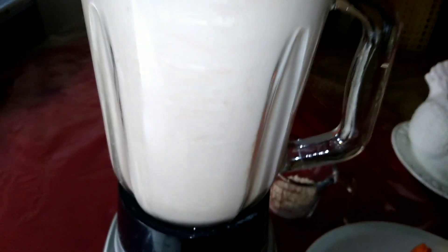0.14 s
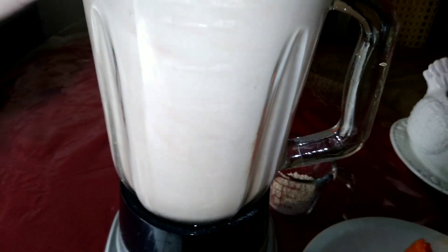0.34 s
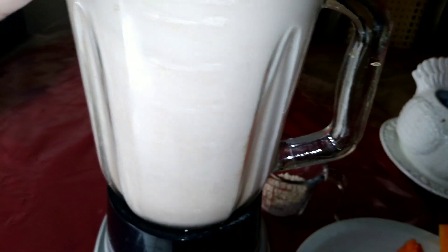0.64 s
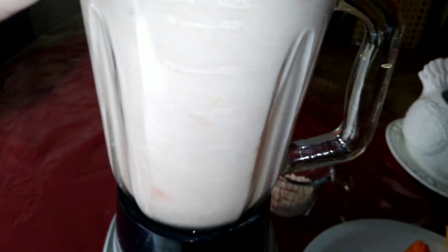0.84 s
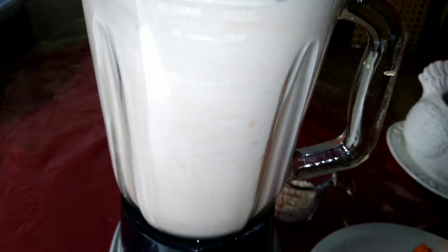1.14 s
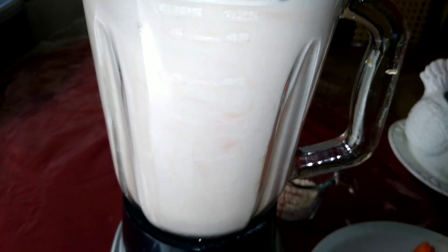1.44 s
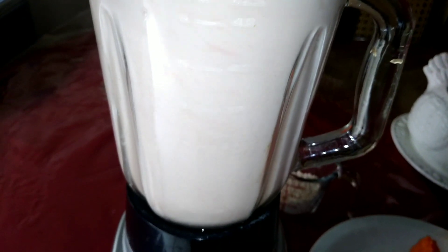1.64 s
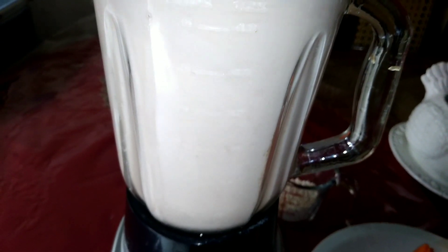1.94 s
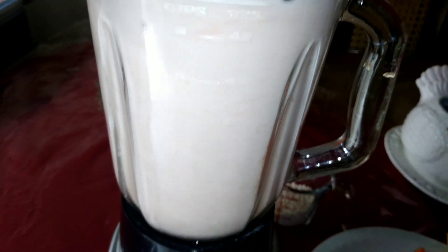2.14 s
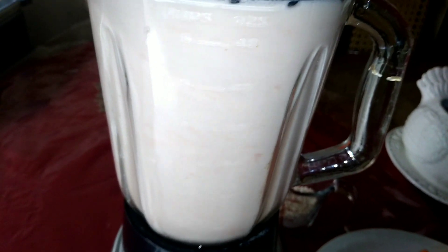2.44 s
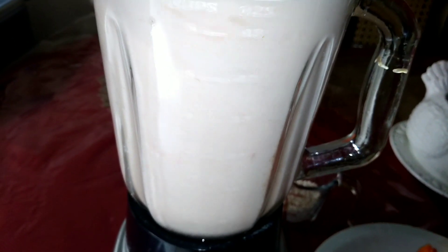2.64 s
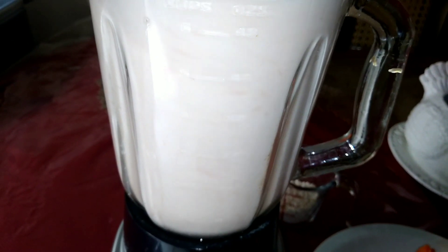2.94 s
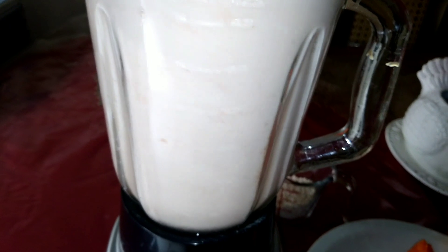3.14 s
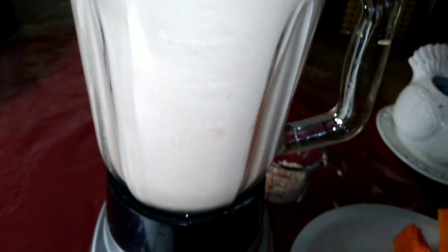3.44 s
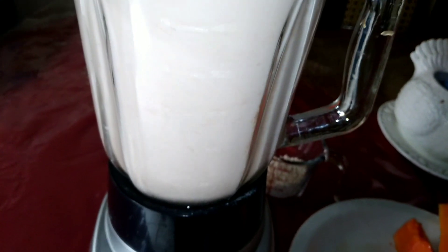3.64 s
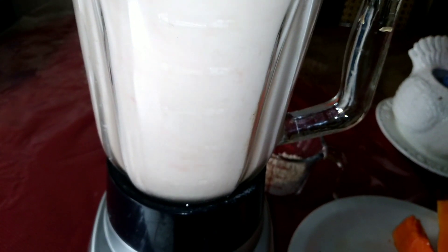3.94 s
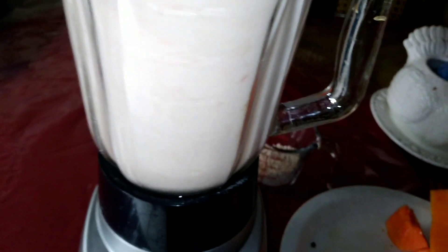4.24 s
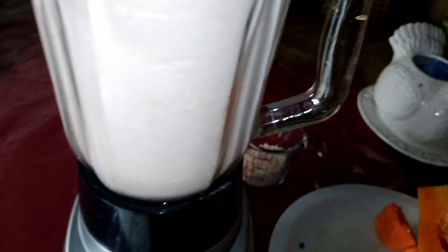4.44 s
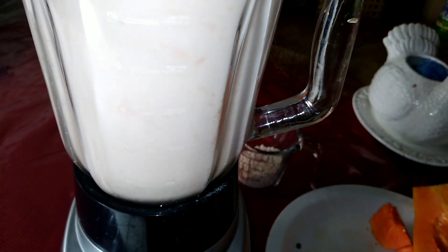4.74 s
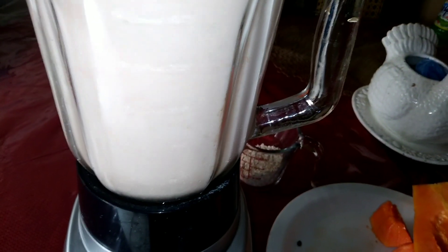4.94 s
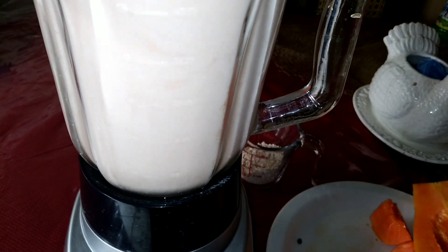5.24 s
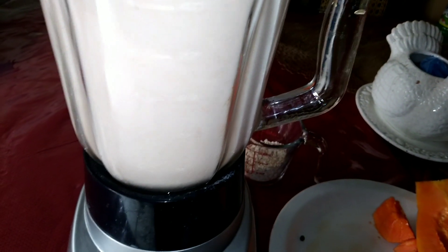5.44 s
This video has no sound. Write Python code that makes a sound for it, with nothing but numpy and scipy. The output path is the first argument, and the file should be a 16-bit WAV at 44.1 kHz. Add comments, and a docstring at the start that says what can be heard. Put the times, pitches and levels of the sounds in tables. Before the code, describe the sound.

Close phone pickup of an electric blender in a small kitchen. Dense, hard crunches and bright glass clatter open over a buzzing motor, with fizzing chips mostly on the left. The load eases into a steady whir and rough hissing swirl, low rumble and bubbling underneath. Occasional lumps still knock the jar, while a fine froth hiss grows. It never switches off.

```python
"""A countertop blender with a glass jar crushes ice into a thick milky drink, close to a phone in a kitchen.
From the start a motor hums and whines, its tones following a wandering shaft speed, over a rumbling base.
At first two blades chop ice in loud rattles, hard lumps slam the jar and coarse chips fizz round the wall.
Later come stray knocks and a growing froth; all along, noise bursts at each blade pass make the grit crackle,
and short rising tones make the vortex bubble, with a swelling gulp now and then."""
import sys
import numpy as np
from scipy import signal
from scipy.fft import rfft, irfft, next_fast_len
from scipy.io import wavfile
from scipy.ndimage import uniform_filter1d

SR = 44100
rng = np.random.default_rng(int(sys.argv[2]) if len(sys.argv) > 2 else 0)


def transcribe(u):
    """Save the signal u as a 16-bit wav file named by the first command-line argument.

    u: samples, shape (n,) or (channels, n), limited to [-1, 1]; the rate is SR.
    q: integer samples, one column per channel.
    """
    v = np.clip(np.atleast_2d(u).T, -1, 1)
    q = np.round(v * 32767).astype(np.int16)
    wavfile.write(sys.argv[1], SR, q)


N = 246519
T = np.arange(N) / SR

# modes of the glass wall where hard ice hits it: (f/Hz, width/Hz, level/dB)
WALL_MODES = [(403, 280, -7), (930, 460, 4.5), (1590, 1100, 3), (2385, 160, 7.5), (2630, 110, 1),
              (3500, 870, 4), (4320, 2300, -11), (5280, 220, -0.5), (6120, 600, 3.5), (7100, 1170, 1),
              (8480, 1760, 2), (10500, 1160, -4), (13200, 5700, -1.5)]
# large air pockets gulped by the vortex: (t/s, half length/s, level over the steady bubbling/dB)
GULP_SWELLS = [(0.12, 0.063, 12.5), (0.505, 0.019, 19), (0.62, 0.014, 8), (1.09, 0.02, 4), (1.3, 0.054, 12),
               (1.48, 0.065, 7.5), (1.57, 0.023, 11), (1.78, 0.022, 11), (1.91, 0.05, 9.5),
               (2.19, 0.027, 16.5), (2.36, 0.043, 19), (3.39, 0.034, 7), (3.91, 0.027, 7)]


def undb(db):
    """Decibels to gain."""
    return 10 ** (np.asarray(db) / 20)


def unit(x):
    """Scale to an rms of one."""
    return x / np.sqrt(np.mean(x ** 2) + 1e-18)


def curves(table):
    """The columns of a timed table, joined by straight lines."""
    s, *columns = np.transpose(table)
    return [np.interp(T, s, c) for c in columns]


def walk(rate):
    """Random levels held 1 / rate s and slewed twice; spread near 1."""
    k = int(SR / rate)
    held = np.repeat(rng.standard_normal(N // k + 1), k)
    return 1.3 * uniform_filter1d(uniform_filter1d(held, k), k)[:N]


def swells(table):
    """A smooth rise and fall in dB for each row."""
    return sum(db * np.exp(-((T - s) / half) ** 2) for s, half, db in table)


def along(table, hz):
    """Read (Hz, value) points on a log-frequency axis."""
    f, value = np.transpose(table)
    return np.interp(np.log(hz + 1), np.log(f), value)


def bins(size=4096):
    """Frequencies on which responses are drawn."""
    return np.arange(size // 2 + 1) * SR / size


def resonances(hz, centre, width, db):
    """Gain of a set of steep-sided resonances, each 9 dB down at one width from its centre."""
    bell = 1 / (1 + ((hz[:, None] - centre) / width) ** 2)
    return np.sqrt((bell * bell * bell) @ undb(db) ** 2)


def shape(pair, gain):
    """Filter each channel with this gain at each frequency, made causal by folding its cepstrum."""
    cepstrum = irfft(np.log(gain + 1e-5))
    half = len(cepstrum) // 2
    fold = np.r_[1, np.full(half - 1, 2), np.zeros(half)]
    response = irfft(np.exp(rfft(cepstrum * fold)))
    return signal.fftconvolve(pair, response[None], axes=1)[:, :pair.shape[1]]


def fade(x, seconds):
    """Let every push die away exponentially."""
    return signal.lfilter([1], [1, -np.exp(-1 / (seconds * SR))], x)


def noise_pair(size, unlike):
    """Noise from a source with some breadth: partly the same at both ports, partly different."""
    mid, side = rng.standard_normal((2, size))
    return np.array([mid + unlike * side, mid - unlike * side]) / np.sqrt(1 + unlike ** 2)


def crackle(turns, scatter_db, snap_s, slip, smooth, unlike):
    """Each of the two blades throws a tiny burst of grit per turn, uneven in size and time, over a smooth hiss."""
    count = int(2 * turns[-1])
    late, size = rng.standard_normal((N // 64, 2))[:count].T
    # slip is the timing spread, in blade passes
    at = np.searchsorted(turns, (np.arange(count) + slip * late) / 2).clip(0, N - 1)
    pushes = np.bincount(at, undb(scatter_db * size.clip(-2, 1.5)), N)
    force = unit(fade(pushes, snap_s)) + smooth
    return unit(force * noise_pair(N, unlike))


def motor(turns):
    """Shaft hum and armature whine follow the speed; the torque throbs at twice the mains frequency."""
    # level of the shaft hum, which comes and goes with the load on the blades: (t/s, level/dB)
    hum_levels = [(0.0, -53), (0.06, -49.5), (0.25, -50.5), (0.56, -66), (0.61, -51), (0.86, -51.5),
                  (0.9, -65), (1.06, -51), (1.26, -53), (1.29, -61), (1.42, -44), (1.52, -44.5), (1.6, -58),
                  (1.82, -44), (2.24, -46), (2.4, -32.5), (2.51, -49), (2.63, -44.5), (2.68, -53.5),
                  (2.94, -46), (3.03, -52), (3.39, -42), (3.69, -48.5), (3.86, -43.5), (4.75, -46.5),
                  (5.25, -44), (5.4, -49), (5.59, -46.5)]
    # level of the armature whine: (t/s, level/dB)
    whine_levels = [(0, -57), (0.12, -44), (0.36, -51), (0.6, -48), (0.68, -50.5), (1.0, -49.5),
                    (1.27, -45), (1.47, -48), (1.58, -47), (1.94, -47.5), (2.1, -49), (2.22, -47),
                    (2.32, -58), (2.48, -42.5), (2.63, -48.5), (2.75, -47), (3.05, -44.5), (3.3, -52),
                    (3.55, -45.5), (3.98, -52.5), (4.15, -48.5), (4.65, -47), (4.75, -48), (4.83, -47),
                    (4.98, -46), (5.12, -56), (5.25, -45.5), (5.5, -46), (5.59, -51)]
    # weaker tones, before easing and throb: (multiple of the shaft speed, left level/dB, right level/dB)
    overtones = [(2, -67.5, -65.5), (3, -64.5, -63), (5, -73, -61.5), (6, -82, -57.5), (9, -86, -62),
                 (24, -49, -70), (48, -74, -70)]
    mains_hz, cruise_hz = 60, 200

    angle = 2 * np.pi * turns
    excess_hz = np.gradient(turns) * SR - cruise_hz
    mains = 2 * np.pi * 2 * mains_hz * T
    throb = np.cos(mains)

    # the hum wavers, the more so as the shaft is dragged below its cruising speed
    hum_db, = curves(hum_levels)
    waver_db = 0.6 + 0.31 * np.maximum(-excess_hz, 0)
    hum = np.sqrt(2) * undb(hum_db + waver_db * walk(24.04)) * np.sin(angle)

    # the armature squeaks as the blades nearly jam
    squeak_s, rise_s, decay_s, squeak_db = 0.44, 0.005, 0.033, -33.5
    jammed_s = np.maximum(T - squeak_s, 0)
    squeak = undb(squeak_db) * (1 - np.exp(-jammed_s / rise_s)) * np.exp(-jammed_s / decay_s)

    # twelve whine cycles per turn; the mains throb adds a tone just below, 9 dB weaker
    slots = 12 * angle + 0.42 * walk(60)
    whine_db, = curves(whine_levels)
    whine_gain = undb(whine_db + 1.9 * walk(23.94)) + squeak
    whine = np.sqrt(2) * whine_gain * (np.sin(slots) + undb(-9) * np.sin(slots - mains))

    # left and right trims in dB
    out = np.outer(undb([-.6, .6]), hum) + np.outer(undb([1.3, -2]), whine)
    # the weaker tones come out as the load eases and the shaft speeds up
    ease_db = 0.82 * excess_hz - .45
    for order, *ears_db in overtones:
        tone = np.sqrt(2) * np.sin(round(order) * angle + rng.uniform(0, 2 * np.pi))
        tone_gain = undb(ease_db + 3.2 * walk(9)) * (1 + 0.79 * throb)
        out += np.outer(undb(ears_db), tone * tone_gain)
    return out


def churn(turns):
    """Liquid rushes low, grit rings the glass in the middle, fine splinters spray on top."""
    # hollow gurgle of the swirling drink: (f/Hz, width/Hz, level/dB)
    swirl_modes = [(844, 200, -2.5), (1094, 310, -2.5), (1620, 460, -8)]
    # the swirl gurgles louder for a moment: (t/s, half length/s, gain/dB)
    gurgle_swells = [(1.45, 0.022, 6), (2.19, 0.035, 7), (2.78, 0.081, 2), (2.98, 0.051, 4.5),
                     (3.42, 0.056, 3), (4.12, 0.034, 0), (4.62, 0.05, 3), (4.95, 0.049, 1)]
    rush_db, swirl_db, grit_db, spray_db, chips_db = -0.33, 1, -1, -0.47, -6

    # power shares that split the spectrum between the layers
    hz = bins()
    below_grit, below_spray = (1 / (1 + (hz / edge) ** 16) for edge in (4200, 6600))
    above_froth = 1 / (1 + (7600 / (hz + 1)) ** 30)
    middle = np.sqrt(below_spray - below_grit)

    # rush and spray share one slow drift
    flow_db = 0.54 * walk(5.8)
    rush = crackle(turns, scatter_db=2.5, snap_s=0.0018, slip=.3, smooth=0.99, unlike=0.48)
    rush = rush * undb(rush_db + flow_db + 1.3 * walk(30))
    grit = crackle(turns, scatter_db=8, snap_s=0.00029, slip=0.16, smooth=0.74, unlike=1.0)
    grit = grit * undb(grit_db + 2.3 * walk(35))
    spray = crackle(turns, scatter_db=4.0, snap_s=0.00095, slip=.2, smooth=0.66, unlike=0.055)
    spray = spray * undb(spray_db + flow_db + 0.5 * walk(30))

    # small chips of ice, hard enough to ring the wall, keep ticking in light flurries
    chips = crackle(turns, scatter_db=6.5, snap_s=0.001, slip=0.11, smooth=0.39, unlike=0.69)
    chips = chips * undb(chips_db + 3.1 * walk(30))
    # they ring it mostly above 4240 Hz
    chips_band = np.sqrt(below_spray / (1 + (4240 / (hz + 1)) ** 24)) + 0.22
    wall = resonances(hz, *np.transpose(WALL_MODES))

    # the swirl opens and closes the lower resonances, each in its own time
    swirl = 0
    for centre_hz, width_hz, mode_db in swirl_modes:
        gurgle = shape(noise_pair(N, unlike=0.12), resonances(hz, centre_hz, width_hz, [mode_db]))
        swirl = swirl + gurgle * undb(swirl_db + swells(gurgle_swells) + 3.35 * walk(30))

    # froth grows by 3.5 dB per second as the drink gets smooth
    froth_hz, froth_width_hz, froth_start_db = 6900, 1200, -16
    froth = shape(noise_pair(N, unlike=0.66), resonances(hz, froth_hz, froth_width_hz, [froth_start_db]))
    froth = froth * undb(3.5 * T)

    rush_tilt_db = along([(500, 0.13), (900, -1.6), (1700, -1.2), (2200, -0.8)], hz)
    return (swirl + froth
            + shape(rush, np.sqrt(below_grit) * undb(rush_tilt_db))
            + shape(grit, middle)
            + shape(spray + 0.064 * grit, np.sqrt(above_froth))
            + shape(chips, chips_band * wall))


def glass(pair, ring_db=-7, ring_t60=0.016, edge_hz=6000):
    """The many close, high modes of the glass ring on briefly after every tick, as a short noise tail."""
    t = np.arange(SR // 10) / SR
    tail = unit(rng.standard_normal((1, len(t))) * np.exp(-np.log(1000) * t / ring_t60)) / np.sqrt(len(t))
    share = undb(ring_db) / np.sqrt(1 + (edge_hz / (bins() + 1)) ** 8)
    rung = shape(signal.fftconvolve(pair, tail, axes=1)[:, :N], share)
    # make room for the added power
    return shape(pair + rung, 1 / np.sqrt(1 + share ** 2))


def jar(force):
    """Jar and housing ring with their resonances, which reach each port with a different strength."""
    # resonances of jar, lid and motor housing: (f/Hz, width/Hz, left level/dB, right level/dB)
    jar_modes = [(790, 370, -37.5, -38), (1010, 102, -34.5, -33.5), (1210, 84, -38.5, -34.5),
                 (1627, 413, -32.5, -30), (2260, 260, -33, -55), (3190, 900, -36.5, -31),
                 (3175, 320, -27.5, -53), (4240, 1800, -29, -36.5), (4795, 380, -21.5, -41),
                 (5380, 590, -22, -39.5), (5827, 460, -23.5, -36.5), (6940, 970, -30.5, -42),
                 (8070, 590, -31.5, -31), (9080, 1400, -33, -32), (10450, 830, -37, -33),
                 (12500, 1050, -41.5, -40), (14400, 1500, -55, -44)]
    centre, width, *ears_db = np.transpose(jar_modes)
    ears = np.array([resonances(bins(), centre, width, db) for db in ears_db])
    both = np.sqrt(np.mean(ears ** 2, axis=0))
    # symmetric filters set the level at each port without shifting phase
    shading = np.fft.fftshift(irfft(ears / both), axes=1)[:, 1:]
    return signal.fftconvolve(shape(force, both), shading, mode="same", axes=1)


def fizz(turns, right_db=-25):
    """Coarse chips skate round the wall at every blade pass; their narrow band reaches mostly the left port."""
    # left level of the fizz, until the chips are ground away: (t/s, level/dB)
    fizz_levels = [(0, -25.5), (0.05, -29), (0.16, -19.5), (0.255, -26.5), (0.277, -16), (0.31, -23),
                   (0.345, -18.5), (0.368, -20.5), (0.4, -17), (0.47, -21.5), (0.52, -28), (0.56, -23.5),
                   (0.63, -21), (0.72, -24.5), (0.76, -17), (0.8, -32), (0.9, -39), (1.2, -70)]
    # narrow band in which the skating chips make the glass sing: (f/Hz, width/Hz, relative level/dB)
    singing_modes = [(4900, 550, -13.5), (5250, 210, -0.5), (5590, 270, 0), (5930, 180, -5),
                     (7000, 600, -14), (8400, 640, -20.5)]
    level_db, = curves(fizz_levels)
    skating = crackle(turns, scatter_db=3.3, snap_s=0.0011, slip=0.13, smooth=0.7, unlike=0.87)
    sung = unit(shape(skating, resonances(bins(), *np.transpose(singing_modes))))
    return sung * undb(level_db) * undb([[0], [right_db]])


def vortex(count=1100, spread=0.13, cycles=1.96, rise=0.1, size_db=3):
    """Air pockets ring briefly in the thick drink, rising in pitch."""
    # centre of the scattered ring pitches of the air pockets: (t/s, f/Hz)
    pocket_pitch = [(0, 374), (.5, 368), (.9, 310), (1.3, 353), (1.5, 276), (2.35, 291), (5.59, 302.3)]
    # level of the bubbling, which rises early, dips near 2.5 s, is loudest near 4.3 s, then falls:
    # (t/s, level/dB)
    bubbling_levels = [(0, -61), (0.9, -58.5), (1.4, -58), (2.5, -60), (4.3, -56.5), (5.59, -64)]
    out = np.zeros(N + SR)
    t = np.arange(SR // 12) / SR
    pocket_hz, = curves(pocket_pitch)
    for start, (pitch, size) in zip(rng.integers(0, N, count), rng.standard_normal((count, 2))):
        # age counts cycles of the starting pitch
        age = t * pocket_hz[start] * np.exp(spread * pitch)
        swell = (1 - np.exp(-2 * age)) * np.exp(-age / cycles)
        ring = np.sin(2 * np.pi * age * (1 + rise * age / 20))
        out[start:start + len(t)] += undb(size_db * size) * swell * ring
    # even out the running loudness, then set the level
    bubbles = out[:N] / np.sqrt(uniform_filter1d(out[:N] ** 2, SR // 12) + 1e-9)
    bubbling_db, = curves(bubbling_levels)
    return bubbles * undb(bubbling_db + swells(GULP_SWELLS) + 2.0 * walk(15))


def rumble():
    """The base shudders on the counter in the deep bass; the drink sloshes above it, harder at each gulp."""
    # spectrum of base and counter, relative only for the shudder: (f/Hz, level/dB)
    rumble_spectrum = [(20, -59), (35, -59), (50, -45.5), (70, -41.5), (88, -40), (125, -49), (170, -39),
                       (260, -33.5), (400, -41.5), (550, -51.5), (900, -54.5)]
    # the base shudders harder on the counter: (t/s, half length/s, level over its steady rumble/dB)
    shudder_swells = [(0.95, 0.075, 13), (2.05, 0.3, 7.5)]
    shake_db, slosh_db, slosh_db_per_s = -67.5, 1.2, -0.5
    hz = bins()
    gain = undb(along(rumble_spectrum, hz))
    deep = 1 / (1 + (hz / 135) ** 8)
    shudder = unit(shape(noise_pair(N, unlike=0.086), gain * np.sqrt(deep)))
    shudder = shudder * undb(shake_db + swells(shudder_swells) + 0.48 * walk(8.6))
    # the sloshing calms as the drink gets smooth
    slosh = shape(noise_pair(N, unlike=0.23), gain * np.sqrt(1 - deep))
    slosh_level_db = slosh_db + slosh_db_per_s * T + 0.27 * swells(GULP_SWELLS) + walk(13)
    return shudder + slosh * undb(slosh_level_db)


def ice(shaft_hz, scatter_db=5.5, snap_s=0.00048, debris=0.92, bite_s=0.0015, settle_s=0.022, level_db=0.36):
    """A caught lump is struck once per blade pass until it breaks; its debris hisses briefly after."""
    # lumps caught by the blades, bands relative to strength: (t/s, length/s, strength/dB, low thud/dB before
    # weighting, mid clatter/dB, glass ring/dB, shrill scrape/dB, splinters/dB)
    lumps = [(0.064, 0.052, 20, -14.5, -17, -4.5, 0.5, -2.5), (0.113, 0.027, 17.5, -9.5, -7.5, -3, 0, -3),
             (0.156, 0.0014, 11.5, 0.5, 1, 6, 0, -4), (0.214, 0.014, -0.5, 7, 10.5, -4, 0, 1),
             (0.242, 0.0032, 7, 1, 2.5, 11, -3, -4), (0.349, 0.0044, 9.5, -4, 0, 7.5, 0, 0),
             (0.377, 0.0018, 13.5, -15, -11, 10.5, 0, -10), (0.383, 0.019, 8.5, -17, -14, -4, 0, -15),
             (0.483, 0.02, 16.5, -9.5, -12, 6, 7, -9), (0.594, 0.0096, 19.5, -14.5, -15, -1.5, 1, -11),
             (0.613, 0.0085, 15.5, -7.5, -7.5, 5, -4, 0), (0.744, 0.013, 3, 0, 5, 7, 0, -9),
             (0.76, 0.004, 10, -2, -1, 13, 2, -5), (0.824, 0.024, 10, -4.5, -2.5, -2, 4, -3),
             (0.886, 0.011, 7.5, -1.5, -4, -2, 0, -2), (0.905, 0.017, 16, -9, -2.5, -6, -4, -2),
             (0.951, 0.0052, 11.5, -3, -4, -6, 0, -3), (0.967, 0.0134, 17, -5, -1.5, -7, -1, -7),
             (1.232, 0.029, 15.5, -11, -12.5, -6.5, -12, -13), (1.633, 0.014, 23, -8, -9.5, -5.5, -9.5, 4),
             (1.669, 0.0034, 9, -29, -26, -15, -18, -15), (1.752, 0.0082, 4.5, -4, -9, 2, -6, -12),
             (2.138, 0.015, 5.5, -6.5, -6, -0.5, -8, -10), (2.427, 0.01, 6.5, 0.5, 0, -2, 0, -3),
             (2.487, 0.0087, -2.5, 9, 13, 0, -4, 0), (2.954, 0.0021, 15, -7.5, -8, -9, -10, -7),
             (2.959, 0.022, 4, -5, -9, -22, -10, -14), (3.137, 0.0082, -2, -1, -1.5, 6, 5, -6),
             (3.385, 0.008, 14.5, -9, -9, -9, -3, -6), (3.395, 0.023, 7.5, -6.5, -3, -15, -5, -11),
             (3.515, 0.0058, 5.5, -3, -1, -9, -1, -6), (3.884, 0.0043, 9, -1.5, -8, -6, -2, -6),
             (4.102, 0.02, 1.5, -1, -1, 0, 2, -2), (4.37, 0.0085, 13.5, -3, -4, -8, -6, 3),
             (4.574, 0.017, 4, -8, 0.5, -5, -6, -3), (4.823, 0.012, 14, -8.5, -4, -9, -3, -10),
             (4.836, 0.018, -6, -10, -6, -12, -5, -10), (4.914, 0.004, 12, -5.5, -3, 2, 5, -6),
             (4.962, 0.018, 3.5, -3, -4, -3, 0, -7), (5.013, 0.0034, 1, -5, -9, 0, 0, -3),
             (5.17, 0.006, 5.5, -5, -1, -2, -1, -3)]
    out = np.zeros((2, N + SR))
    t = np.arange(SR // 8) / SR
    wall = resonances(bins(), *np.transpose(WALL_MODES))
    for s, length, crunch, thud_db, clatter_db, ring_db, scrape_db, splinter_db in lumps:
        start = int(s * SR)
        blade_hz = 2 * shaft_hz[start]
        late, size = rng.standard_normal((32, 2)).clip(-1.5, 1.5).T
        blows = np.abs(np.arange(len(late)) + .15 * late) / blade_hz
        # the first blow always lands
        caught = blows <= max(length, blows[0])
        pushes = np.bincount((blows[caught] * SR).astype(int), undb(scatter_db * size[caught]), len(t))
        during = t < length
        strikes = fade(pushes, snap_s)
        strikes = strikes / np.sqrt(np.mean(strikes[during] ** 2))
        # debris from a longer tussle takes longer to settle, up to settle_s
        spill = debris * np.exp(-np.maximum(t - length, 0) / min(settle_s, 1.56 * length))
        # the blades take a moment to bite fully
        force = (strikes + spill) * (1 - 0.47 * np.exp(-t / bite_s))
        burst = force * noise_pair(len(t), unlike=0.5) / np.sqrt(np.mean(force[during] ** 2))
        knock, ring = crunch + thud_db, crunch + ring_db
        clatter, scrape = crunch + clatter_db, crunch + scrape_db
        # heavy knocks reach the low modes of the wall more than in proportion
        thud = knock + 0.42 * (knock - 18)
        colour = [(300, knock), (900, thud), (1600, thud), (2300, knock - 1),
                  (3200, clatter), (4100, clatter), (5250, ring + 1), (6200, ring),
                  (6650, scrape), (7350, scrape), (7800, crunch), (9400, crunch),
                  (11000, crunch + splinter_db)]
        out[:, start:start + len(t)] += shape(burst, wall * undb(along(colour, bins()) + level_db))
    return out[:, :N]


def shimmer(blows, ring_db=-8, ring_t60=0.18, centre_hz=8600, width_hz=1100):
    """After a blow the highest strong modes of the glass ring longest, as a soft bright puff."""
    t = np.arange(SR // 4) / SR
    tail = unit(rng.standard_normal((1, len(t))) * np.exp(-np.log(1000) * t / ring_t60)) / np.sqrt(len(t))
    rung = signal.fftconvolve(blows, tail, axes=1)[:, :N]
    return blows + shape(rung, resonances(bins(), centre_hz, width_hz, [ring_db]))


def slams(contact_s=0.0074):
    """A hard lump pressed against the jar for a moment drives its few low modes, which then die quickly."""
    # lumps slammed against the jar, drive per mode:
    # (t/s, lowest mode f/Hz, lowest mode drive/dB, middle modes drive/dB, high modes drive/dB)
    slam_blows = [(0.136, 980, -10, -8, 2), (0.487, 580, 3, -19, -12), (0.498, 737, 5, -14, -8),
                  (0.616, 828, 2.5, -8, -8), (0.914, 1010, -17, -5, 3), (0.971, 980, -20, -1, -3),
                  (1.635, 877, 9, 3, -6), (3.388, 1076, -7, -9, -8), (4.369, 985, 6, 7.5, 12),
                  (4.825, 960, -3, -2, -4), (4.916, 1016, -1.5, -18, -12)]
    # modes of the filled jar, the lowest retuned by the place of each blow: (f/Hz, t60/s, level before drive/dB)
    body_modes = [(1010, 0.036, -1), (1572, 0.015, -1.5), (2300, 0.047, -10), (3155, 0.014, 0),
                  (3543, 0.02, 0), (3940, 0.014, -6)]
    out = np.zeros((2, N + SR))
    t = np.arange(SR // 8) / SR
    push = np.sin(np.pi * np.minimum(t / contact_s, 1))
    for s, lowest_hz, low_db, middle_db, high_db in slam_blows:
        start = int(s * SR)
        for k, (hz, t60, db) in enumerate(body_modes):
            if k == 0:
                pitch, drive_db = lowest_hz, low_db
            else:
                pitch, drive_db = hz, middle_db if hz < 2700 else high_db
            swell = fade(push, t60 / np.log(1000))
            tone = swell / swell.max() * np.sin(2 * np.pi * pitch * t)
            out[:, start:start + len(t)] += undb(db + drive_db) * tone
    return out[:, :N]


def kitchen(pair, walls_db=-13, walls_t60=0.15):
    """A short tail from the walls, different at each ear."""
    t = np.arange(SR // 2) / SR
    # the first reflections arrive after 4 ms
    decay = undb(-60 * t / walls_t60) * (t > .004)
    tail = unit(rng.standard_normal((2, len(t))) * decay) / np.sqrt(len(t))
    return pair + undb(walls_db) * signal.fftconvolve(pair, tail, axes=1)[:, :N]


def ports(pair):
    """The two microphone ports receive sound with a phase shift that depends on frequency."""
    # phase between the ports: (f/Hz, lead of the left/rad)
    port_phase = [(30, 1), (680, 0.2), (1000, -1), (1600, 1.15), (2400, 1.78), (3100, -3), (3600, -2.5),
                  (4700, -5.5), (6300, -7), (16000, -5.5)]
    size = next_fast_len(N + 2048)
    turned = rfft(pair[1], size) * np.exp(-1j * along(port_phase, bins(size=size)))
    right = irfft(turned, size)[:N]
    return np.array([pair[0], right])


def scene():
    """One shaft drives the tones, the churning and the blows on the ice."""
    # motor shaft speed, sagging whenever the blades bite: (t/s, turns per second/Hz)
    shaft_speed = [(0.17, 196.7), (0.27, 195.9), (0.3, 193.4), (0.45, 190.8), (0.51, 188.4), (0.58, 195.2),
                   (0.8, 195.7), (1.0, 195.2), (1.07, 199.9), (1.18, 196.5), (1.31, 196.2), (1.42, 199.9),
                   (1.52, 199.9), (1.65, 194.2), (1.75, 199.2), (1.84, 201.8), (1.92, 199.2), (2.02, 202.7),
                   (2.1, 200), (2.2, 199.6), (2.3, 204.4), (2.38, 203.5), (2.47, 199.2), (2.6, 199.6),
                   (2.69, 197), (2.8, 198.1), (2.92, 199.7), (3.12, 197.1), (3.24, 202.3), (3.36, 203.9),
                   (3.65, 198), (3.81, 202.9), (3.96, 203.6), (4.1, 202.1), (4.38, 202.3), (4.48, 199.5),
                   (4.6, 200.4), (4.7, 199.3), (4.88, 201.3), (5.05, 201.3), (5.17, 202.8), (5.25, 200.5),
                   (5.32, 200), (5.4, 197.3), (5.5, 201.4), (5.59, 203.3)]
    shaft_hz, = curves(shaft_speed)
    turns = np.cumsum(shaft_hz) / SR
    ticks = churn(turns) + shimmer(ice(shaft_hz))
    contents = jar(glass(ticks) + slams()) + fizz(turns) + vortex() + rumble()
    # the motor stays dry, without the tail of the walls
    return ports(kitchen(contents) + motor(turns))


def record(dry):
    """The phone rounds the loudest peaks and cuts the top."""
    ceiling, top_hz = .8, 15750
    rounded = dry / (1 + (dry / ceiling) ** 4) ** (1 / 4)
    lowpass = signal.ellip(10, .2, 80, top_hz, fs=SR, output="sos")
    return signal.sosfilt(lowpass, rounded)


dry = scene()
out = record(dry)
transcribe(out)
```